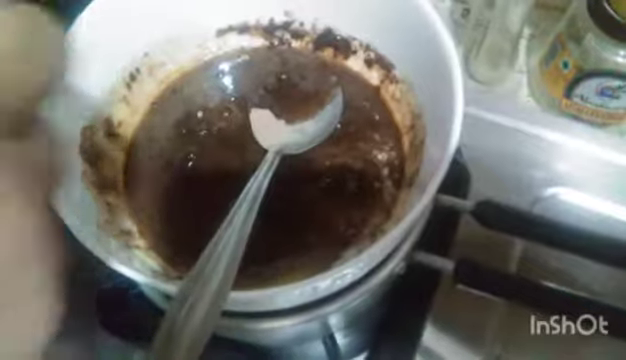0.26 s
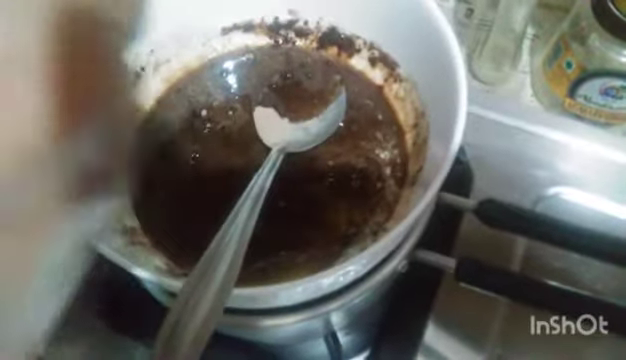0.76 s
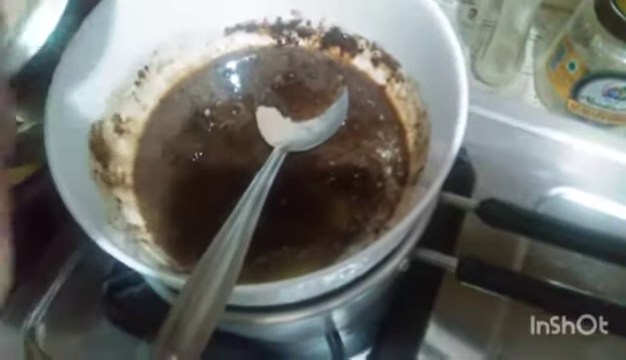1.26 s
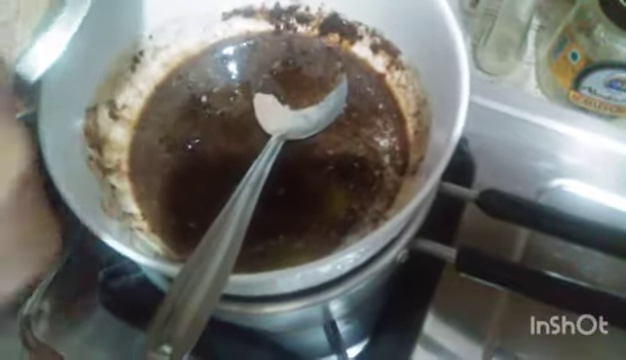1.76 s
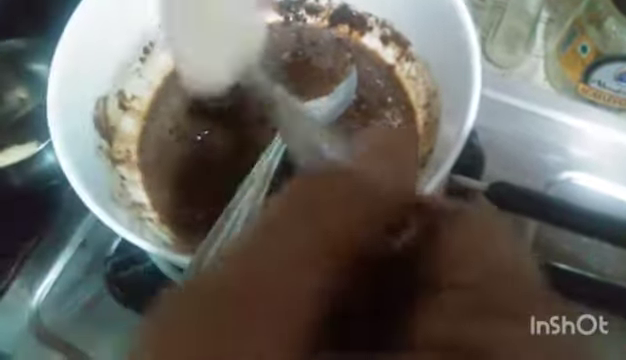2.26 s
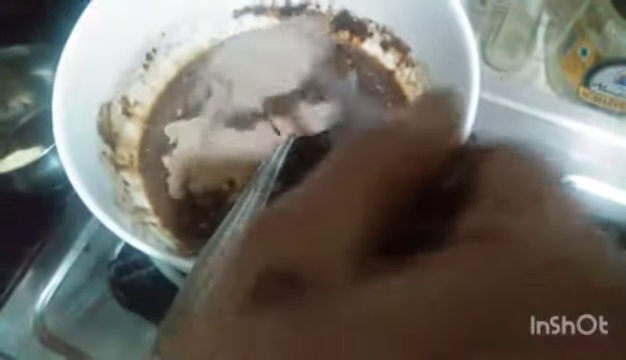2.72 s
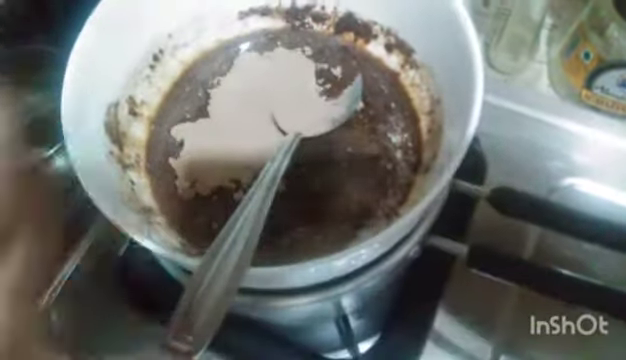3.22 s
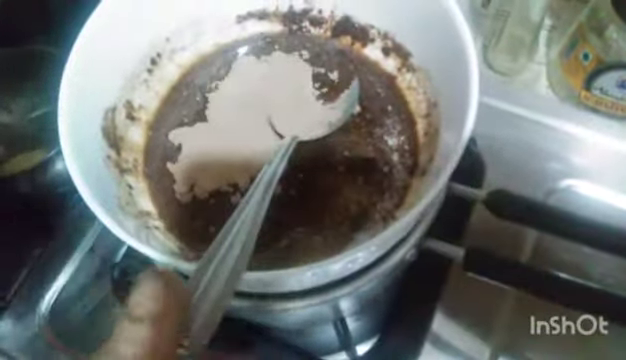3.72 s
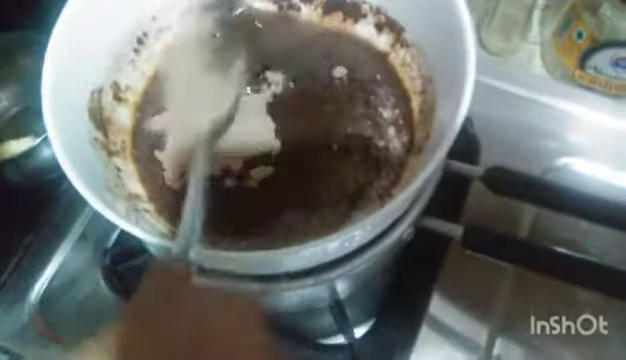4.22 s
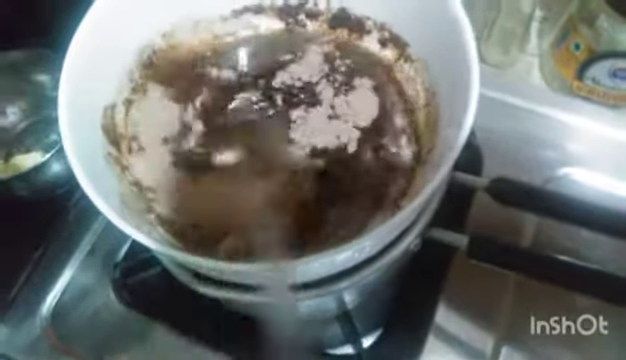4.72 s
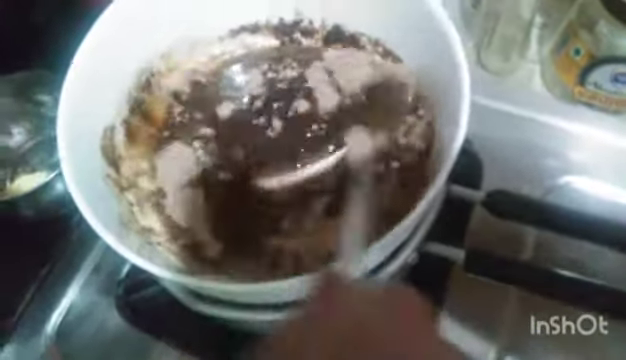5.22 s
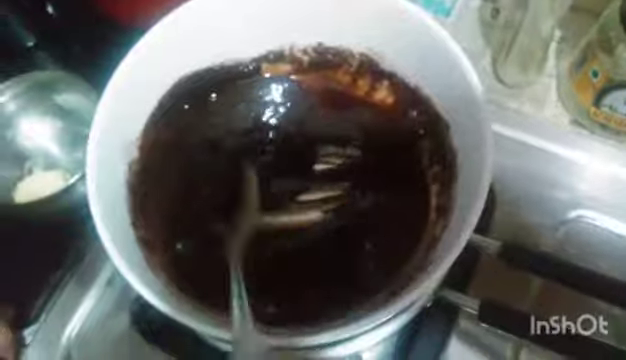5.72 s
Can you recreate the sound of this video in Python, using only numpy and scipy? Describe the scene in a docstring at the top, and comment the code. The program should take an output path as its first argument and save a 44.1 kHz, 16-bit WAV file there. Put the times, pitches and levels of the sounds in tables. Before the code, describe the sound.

Close kitchen sounds: two bright metal clatters and scattered spoon clinks against a ceramic bowl, with a soft hiss behind.

```python
"""A kitchen, close to a phone. A spoon taps and rubs a ceramic bowl: taps crack and ring it, strokes
drag steel through powder. Loose cutlery clatters and a measuring spoon drops; each contact chatters,
rings the metal and knocks the counter. Behind, a hiss swells and fades and low thumps come and go.
The phone's suppressor shuts every frequency that falls quiet, passing only the crest of the hiss and
the heads of the echoes. House murmur and electronic fizz stay underneath."""
import sys
import numpy as np
from scipy import signal
from scipy.fft import rfft, irfft, next_fast_len
from scipy.io import wavfile
from scipy.ndimage import uniform_filter1d, map_coordinates

SR = 44100
rng = np.random.default_rng(int(sys.argv[2]) if len(sys.argv) > 2 else 0)


def put_to_file(sound):
    """Save the sound as 16-bit audio at rate SR, in the file named by the first command-line argument."""
    columns = np.atleast_2d(sound).T  # one column per channel
    safe = np.clip(columns, -1, 1)
    whole_steps = np.round(safe * 32767)
    wavfile.write(sys.argv[1], SR, whole_steps.astype(np.int16))


N = 263629

# Spectra of house murmur and electronic fizz. Each row: frequency in Hz, relative density in dB.
MURMUR_COLOUR = [(15, -70), (25, -39.5), (162, -33), (247, -5), (286, -10.5), (377, -5), (534, -8),
                 (757, -11), (1070, -14), (2000, -18), (2600, -47.5), (4400, -120)]
FIZZ_COLOUR = [(1000, -23), (2000, 4.5), (7000, 1.5), (15000, -11.5)]
# Hiss envelope. Each row: time in seconds, level in dB.
HISS_LEVELS = [(0.0, -55), (0.3, -56), (0.7, -55.5), (1.1, -58.5), (1.8, -57.5), (2.8, -59), (2.95, -58),
               (3.12, -53.5), (3.5, -59), (3.75, -54), (4.69, -56.5), (5.11, -55.5), (5.98, -54.5)]
# Hiss spectrum. Each row: frequency in Hz, relative density in dB.
HISS_SPECTRUM = [(900, -18), (1600, -11), (2300, -6.5), (3000, 4.5), (3700, -1), (4450, 1.5), (4900, 2),
                 (5400, -1), (6000, -9.5), (6500, -8), (7500, -17), (9000, -13), (11000, -34.5),
                 (15000, -43.5)]
# Standing peaks and dips in the hiss. Each row: centre in Hz, width in Hz, gain in dB.
HISS_STREAKS = [(2460, 98, 4), (2957, 120, 0), (3270, 69, -1.5), (3470, 100, 5.5), (3814, 150, 3.5),
                (4050, 110, 0), (4490, 150, -6.5), (2830, 100, -4), (3130, 60, -5), (4720, 57, -3),
                (4820, 80, 5), (4940, 29, 2.5), (5630, 270, 2.5), (6900, 41, 0)]
# Low thumps. Each row: centre time in seconds, pitch in Hz, level in dB, length in seconds.
LOW_THUMPS = [(0.004, 358, -52, 0.102), (0.213, 248, -71, 0.075), (1.34, 510, -67.5, 0.035),
              (1.66, 355, -67.5, 0.076), (2.553, 370, -75.5, 0.068), (2.658, 248, -74.5, 0.1),
              (2.951, 355, -71, 0.056), (3.133, 241.7, -68.5, 0.048), (3.294, 343, -74.5, 0.056),
              (3.916, 324, -54, 0.069), (4.005, 251, -56.5, 0.19), (4.076, 351, -63.5, 0.15),
              (4.16, 249.6, -66, 0.1), (5.27, 374, -66.5, 0.046), (5.384, 330, -64.5, 0.058),
              (5.706, 334, -72, .04)]
# Spoon on bowl. Each row: start in seconds, nominal peak in dB, then in relative dB weight near 1 kHz,
# edge near 7 kHz, snap near 12 kHz and slide, then clink pitch in Hz.
SPOON_TAPS = [(0.0044, -39, -2, -46, -57, -9, 2640), (0.0843, -33, -31, -5, -12, -3, 5490),
              (1.1637, -17.5, -28, -25, -32, -26.5, 5740), (1.258, -34, -35, -1.5, -34, -8.5, 4300),
              (1.3414, -33, -41, -6, -41, -8, 3400), (1.4157, -33.5, -47, -12, -61, -35.5, 2850),
              (1.6082, -31.5, -35, -4, -42, -8, 4270), (1.6415, -39, -10, -24, -33, -13, 2630),
              (2.3166, -38, -33, -9, -62, -22, 3360), (2.4999, -41.5, -31, 15.5, -31, -21.5, 5000),
              (3.841, -35.5, -8, -21, -63, -22, 4000), (3.8592, -20.5, -9.5, -20.5, -67, -19, 3290),
              (3.9394, -36, 0, -41, -52, -9, 3040), (4.004, -40.5, -3, -32, -43, -7, 2650),
              (4.1406, -16.5, -8, -4, -9, -24.5, 2750), (4.2005, -38, -12.5, -2, -39, -6, 4800),
              (4.341, -39, -42, -42.5, -48, -24, 4770), (4.3914, -37, -46, -13, -42, -27.5, 6500),
              (4.418, -20.5, -36, -23.5, -71, -41, 5650), (4.7369, -38.5, -22.5, -6, -44, -17.5, 3560),
              (5.0796, -21, -25, -14, -35, -27.5, 5340), (5.1497, -41.5, -32, -5.5, -58, -22, 4710),
              (5.2448, -33, -33, 6, -5, -42, 6550), (5.3283, -34.5, -8.5, -35.5, -29.5, -6, 2770),
              (5.5406, -19, -2.5, -7.5, -68, -24, 3100), (5.6348, -32.5, -30, -8, -9, -43, 2940),
              (5.679, -34.5, -31, -47, -52, -12, 2970), (5.8733, -32, -39, -57, -59, -18.5, 4640),
              (5.9225, -40, -16, -24.5, -51, -11, 4280), (5.9415, -32.5, -30, -33, -42, -6, 3070)]
# Spread of a tap's weight. Each row: frequency in Hz, multiplier of the weight's dB, offset in dB.
WEIGHT_SPREAD = [(470, 1.6, 1.5), (1050, 1, 2), (1950, 0.89, 1)]
# Bowl modes, damped by its load. Each row: frequency in Hz, gain in dB, T60 in seconds.
BOWL_MODES = [(550, 0, .07), (860, 8, .05), (1060, -3, .05), (1320, 4, .045), (1600, 0, .05),
              (1780, 0, .05), (2400, -2, .04), (2880, 0, .04), (3300, 2, .03), (4300, 0, .03),
              (4750, 0, .03), (5250, 0, .03), (6500, -3, .03)]
# Room decay. Each row: frequency in Hz, base T60 in seconds.
ROOM_T60 = [(250, 0.39), (1000, 0.51), (4000, 0.35), (8500, 0.38), (12000, 0.45), (15500, 0.45)]
# Spoon strokes. Each row: time of full pressure, rise and hold in seconds, level in dB.
STROKES = [(0.11, .01, .02, -50), (1.173, 0.03, 0.33, -46), (1.583, 0.017, 0.0039, -47),
           (3.076, 0.069, .08, -60.5), (5.086, .01, 0.0085, -54.5), (5.231, 0.034, 0.0088, -53.5),
           (5.35, 0.044, 0.014, -70), (5.65, 0.11, 0.0077, -56), (5.975, .1, .02, -42.5)]
# Rubbing spectrum. Each row: frequency in Hz, relative density in dB.
STROKE_COLOUR = [(900, -36), (1700, -14), (2500, -0.5), (3500, 0), (4400, 1), (5500, -4), (6700, -9),
                 (7600, -16.5), (9000, -16), (10500, -33.5), (15000, -50.5)]
# Cutlery contacts. Each row: start in seconds, strength in dB, chatter length in seconds.
CUTLERY_CONTACTS = [(0.3115, -1.5, 0.014), (0.3305, -3, 0.015), (0.3424, -10, 0.005),
                    (0.3688, -16.5, 0.0087), (0.3831, -10.5, 0.01), (0.3994, -10.5, 0.017),
                    (0.4134, -8.5, 0.0054), (0.4275, -5, 0.018), (0.4933, -3.5, 0.012),
                    (0.5094, -11.5, 0.005)]
# Cutlery modes. Each row: frequency in Hz, free width in Hz, gain in dB.
CUTLERY_MODES = [(1138, 32, -14), (1440, 25, -11), (1830, 45, -12), (2484, 40, -3), (3030, 18, -14),
                 (3498, 30, 6.5), (3820, 43, -7.5), (4020, 85, -14), (4383, 34, 2.5), (4810, 110, -9),
                 (5040, 12, -17.5), (5290, 25, -23.5), (6000, 51, -21), (6180, 40, -17.5),
                 (5960, 63.3, -9.5), (6670, 45.6, -12), (6970, 60, -22.5), (7550, 30, -18.5),
                 (8114, 83, -7.5), (9760, 100, -18), (9900, 44, -35), (10230, 42.5, -32.5),
                 (10690, 40, -29.5), (10860, 40, -24)]
# Spectra of metal chatter and counter knock. Each row: frequency in Hz, relative density in dB.
CHATTER_COLOUR = [(120, -72), (200, -42.5), (772, -17), (1200, -18), (1430, -9), (1990, -6), (2390, 2),
                  (2770, -18.5), (3440, 8.5), (3710, -5.5), (4210, -5), (6290, -3.5), (7550, -27),
                  (8420, -10.5), (15700, -52.5)]
KNOCK_COLOUR = [(150, -42.0), (350, -17.5), (520, 0.5), (800, 2.5), (1200, -6), (2000, -18.5)]
# Dropped spoon's contacts. Each row: start in seconds, strength in dB, chatter length in seconds.
DROP_CONTACTS = [(3.535, -3, 0.008), (3.5471, -7.5, 0.0082), (3.5519, -7.5, 0.0082), (3.5614, -11, 0.02),
                 (3.573, -8.5, 0.014), (3.5876, -8, 0.013), (3.6009, -28.5, 0.0034)]
# Dropped spoon's modes. Each row: frequency in Hz, free width in Hz, gain in dB.
DROP_MODES = [(1043, 22, -18.5), (1405, 15, -11), (1825, 50, -12), (2126, 16, -19.5), (2433, 44, -22),
              (2638, 12, -13), (2710, 31, -29), (3430, 260, -4.5), (3580, 7.9, 0.5), (4186, 49, 5.5),
              (4760, 77, -19), (5030, 23, -8.5), (5330, 57, -2), (6264, 150, -3.5), (6450, 92, -2.5),
              (6600, 11, -18), (7240, 38, -13), (8080, 30, -5), (8240, 110, -7), (8870, 33, -6),
              (9610, 57, -17), (9030, 23, -34), (9370, 15, -17.5), (11520, 63, -32.5), (13300, 180, -40.5),
              (13860, 34, -25), (14180, 30, -28.5)]
# Microphone bass cut. Each row: frequency in Hz, gain in dB.
MIC_RESPONSE = [(30, -43.5), (150, -32.5), (200, -9.5), (260, -1.5), (20000, -1)]
# Suppressor threshold. Each row: frequency in Hz, power density in dB.
GATE_THRESHOLD = [(300, -112), (1500, -104), (4000, -103), (8000, -104), (11000, -110), (15000, -110)]


def amp(db):
    """dB to gain."""
    return 10 ** (np.asarray(db) / 20)


def unit_rms(x):
    """x at rms 1."""
    return x / np.sqrt(np.mean(x ** 2) + 1e-20)


def unit_burst(x):
    """x with its strongest 5 ms at rms 1."""
    return x / np.sqrt(np.max(uniform_filter1d(x * x, size=220)) + 1e-20)


def along(points, hz):
    """Interpolate (Hz, value) points on a log frequency axis."""
    point_hz, values = np.transpose(points)
    return np.interp(np.log(hz + 1), np.log(point_hz + 1), values)


def coloured(x, points):
    """x through a zero-phase filter of (Hz, dB) points."""
    size = next_fast_len(len(x) + 2048)
    gain = amp(along(points, np.fft.rfftfreq(size, 1 / SR)))
    return irfft(rfft(x, size) * gain, size)[:len(x)]


def causal(x, db_at_hz):
    """x through a minimum-phase filter, built by folding the cepstrum."""
    size = next_fast_len(len(x) + 4096)
    gain_db = np.maximum(db_at_hz(np.fft.rfftfreq(size, 1 / SR)), -120)
    cepstrum = irfft(np.log(amp(gain_db)), size)
    cepstrum *= np.where(np.arange(size) < size // 2, 2, 0)
    cepstrum[0] /= 2
    return irfft(rfft(x, size) * np.exp(rfft(cepstrum)), size)[:len(x)]


def ringing(x, modes, scatter_db):
    """x through two-pole resonances of alternating sign and randomly scattered gain."""
    size = next_fast_len(len(x))
    hz = np.fft.rfftfreq(size, 1 / SR)
    mode_hz, width_hz, db = np.transpose(modes)[:, :, None]
    signs = (-1.) ** np.arange(len(mode_hz))[:, None]
    gain = signs * amp(db + scatter_db * rng.standard_normal(mode_hz.shape))
    peaks = 1j * hz * width_hz / (mode_hz ** 2 - hz ** 2 + 1j * hz * width_hz)
    return irfft(rfft(x, size) * np.sum(gain * peaks, axis=0), size)[:len(x)]


def add(track, start_s, sound):
    """Mix a sound into the track."""
    part = track[round(start_s * SR):][:len(sound)]
    part += sound[:len(part)]


def noise_floor():
    """Steady low murmur of the house and fizz of the electronics."""
    murmur = amp(-81.5) * unit_rms(coloured(rng.standard_normal(N), MURMUR_COLOUR))
    fizz = amp(-83.5) * unit_rms(coloured(rng.standard_normal(N), FIZZ_COLOUR))
    return murmur + fizz


def hiss():
    """Noise with standing streaks and long thin random patches; fuller below 3 kHz as it swells."""
    pivot_db, widen_db_per_db, patch_db = -56.5, 0.53, 3.3
    hz, t, spectra = signal.stft(rng.standard_normal(N + 1024), SR, nperseg=1024)
    hz = hz[:, None]
    patches = uniform_filter1d(rng.standard_normal(spectra.shape), size=3, axis=0)
    patches = unit_rms(uniform_filter1d(patches, size=16, axis=1))
    level_db = np.interp(t, *np.transpose(HISS_LEVELS))
    widen_db = widen_db_per_db * (level_db - pivot_db) * np.clip((3000 - hz) / 700, 0, 1)
    streaks_db = sum(db * np.exp(-((hz - centre_hz) / width_hz) ** 2)
                     for centre_hz, width_hz, db in HISS_STREAKS)
    colour = unit_rms(amp(along(HISS_SPECTRUM, hz) + streaks_db))
    spectra *= colour * amp(level_db + widen_db + patch_db * patches)
    return signal.istft(spectra, SR, nperseg=1024)[1][:N]


def thumps():
    """Soft low swells of narrow-band noise."""
    out, t = np.zeros(N), np.arange(-SR // 4, SR // 4) / SR
    for centre_s, hz, db, length_s in LOW_THUMPS:
        band = [(hz / 1.3, -40), (hz / 1.04, 0), (hz * 1.04, 0), (hz * 1.2, -40)]
        noise = unit_rms(coloured(rng.standard_normal(len(t)), band))
        swell = amp(db) * np.exp(-(1.6 * t / length_s) ** 2) * noise
        start = round(centre_s * SR) - SR // 4
        add(out, max(start, 0) / SR, swell[max(-start, 0):])
    return out


def spoon_taps():
    """A crack and a slide ring the bowl; a heavy landing fills the lows, the spoon's edge the treble."""
    rise_s, slide_t60_s, crest_db = 0.00028, 0.14, 9
    ring_db, damping_db_per_db = 3.5, 0.15  # weight on the bowl weakens its ring
    out, t = np.zeros(N), np.arange(SR // 4) / SR
    modes = [(hz, np.log(1000) / (np.pi * t60_s), db) for hz, db, t60_s in BOWL_MODES]
    for start_s, peak_db, weight_db, edge_db, snap_db, slide_db, clink_hz in SPOON_TAPS:
        colour = [(hz, share * weight_db + offset_db) for hz, share, offset_db in WEIGHT_SPREAD]
        colour += [(4000, 0.01), (7400, edge_db), (11500, snap_db)]
        tilted = [(hz, db - 3.4 * np.log2(hz / 4000)) for hz, db in colour]
        spectrum = [(170, colour[0][1] - 30)] + tilted + [(16000, snap_db - 12)]
        attack = 1 - np.exp(-t / rise_s)
        decay = np.exp(-t / (1.5 * rise_s)) + amp(slide_db - 60 * t / slide_t60_s)
        crack = causal(attack * decay * rng.standard_normal(len(t)), lambda hz: along(spectrum, hz))
        ring = amp(ring_db - damping_db_per_db * weight_db) * ringing(crack, modes, scatter_db=3)
        clink = ringing(crack, [(clink_hz, 350, 13)], scatter_db=6)  # the spoon's edge pings
        blow = amp(peak_db - crest_db) * unit_burst(crack + ring + clink)
        add(out, start_s, blow)
        add(out, start_s, amp(-4.5) * room_echo(blow, t60_scale=0.93))
    return out


def room_echo(blow, t60_scale):
    """A fresh diffuse tail for one blow; each frequency dies at its own rate."""
    hz, t, spectra = signal.stft(rng.standard_normal(SR // 2), SR, nperseg=256)
    t60_s = t60_scale * along(ROOM_T60, hz)[:, None]
    tail = signal.istft(spectra * amp(-60 * t / t60_s), SR, nperseg=256)[1]
    delayed = np.pad(blow, (200, 0))
    return signal.fftconvolve(delayed, tail / np.linalg.norm(tail))[:SR // 2]


def spoon_rubbing():
    """Steel dragged through powder: dense uneven grains under each stroke's rise, hold and release."""
    touch_db, hold_db_per_s, release_db_per_s = -15.5, 17, 96
    envelope, t = np.zeros(N), np.arange(N) / SR
    clumps = map_coordinates(rng.standard_normal(N // 200 + 4), [np.arange(N) / 200])
    grains = rng.standard_normal(N) * amp(1.3 * clumps + 3 * rng.standard_normal(N))
    for pressed_s, rise_s, hold_s, db in STROKES:
        age_s = t - pressed_s
        rise_db = np.where(age_s > -rise_s, touch_db * np.clip(-age_s / rise_s, 0, 1), -120)
        ease_db = hold_db_per_s * np.clip(age_s, 0, hold_s)
        release_db = release_db_per_s * np.maximum(age_s - hold_s, 0)
        envelope += amp(db + rise_db - ease_db - release_db)
    return envelope * unit_rms(coloured(grains, STROKE_COLOUR))


def metal_clatter(contacts, modes, tilt_db_per_oct):
    """Each contact is a gritty chatter of loose pieces that rings the metal and knocks the counter."""
    chatter_db, ring_db, knock_db, knock_db_per_db = -11.5, -13, -39, 0.2
    out, t = np.zeros(N), np.arange(SR // 4) / SR
    damped_modes = np.add(modes, [0, 20, 0])  # touching pieces damp each other: 20 Hz wider
    attack = 1 - np.exp(-t / 0.00066)
    spike = 2.8 * np.exp(-t / 0.00091)
    tail = 0.14 * amp(-60 * t / 0.082)
    for start_s, db, length_s in contacts:
        envelope = attack * (np.exp(-(t / length_s) ** 3) + spike + tail)
        grit = envelope * rng.standard_normal(len(t)) * amp(5 * rng.standard_normal(len(t)))
        chatter = unit_burst(causal(
            grit, lambda hz: along(CHATTER_COLOUR, hz) + tilt_db_per_oct * np.log2(hz / 4000 + .01)))
        knock = unit_burst(causal(grit, lambda hz: along(KNOCK_COLOUR, hz)))
        ring = unit_burst(ringing(grit, damped_modes, scatter_db=2))
        blow = amp(db) * (amp(chatter_db) * chatter + amp(ring_db) * ring)
        blow += amp(knock_db + knock_db_per_db * db) * knock
        add(out, start_s, blow)
        add(out, start_s, amp(-4) * room_echo(blow, t60_scale=0.83))
    return out


def suppressor(x):
    """Turns each frequency down, by up to 46 dB, as its recent power falls to the threshold."""
    framing = dict(nperseg=512, noverlap=384, scaling="psd")
    hz, _, spectra = signal.stft(x, SR, **framing)
    recent_power = uniform_filter1d(np.abs(spectra) ** 2, size=12, axis=1, origin=5)  # last 35 ms
    threshold_power = amp(2 * along(GATE_THRESHOLD, hz))[:, None]
    gain = np.clip(1 - threshold_power / (np.abs(recent_power) + 1e-20), amp(-46), 1)
    return signal.istft(spectra * gain, SR, **framing)[1][:N]


def scene():
    """Metal, bowl, hiss and thumps, summed in mono."""
    cutlery = metal_clatter(CUTLERY_CONTACTS, CUTLERY_MODES, tilt_db_per_oct=0.77)
    dropped_spoon = metal_clatter(DROP_CONTACTS, DROP_MODES, tilt_db_per_oct=2.4)
    return (cutlery + dropped_spoon + spoon_taps() + spoon_rubbing() + hiss() + thumps())[None]


def record(dry):
    """Phone chain: bass cut, suppressor, added noise floor, band limit."""
    top_hz = 15800
    bass_cut = causal(dry[0], lambda hz: along(MIC_RESPONSE, hz))
    spectrum = rfft(suppressor(bass_cut) + noise_floor())
    return irfft(spectrum * (np.fft.rfftfreq(N, 1 / SR) < top_hz), N)[None]


dry = scene()
out = record(dry)
put_to_file(out)
```